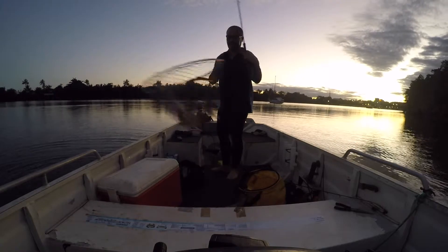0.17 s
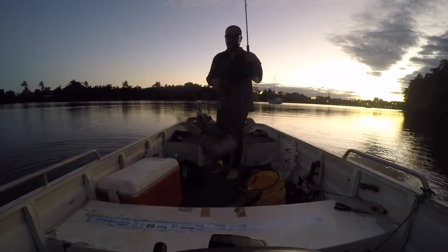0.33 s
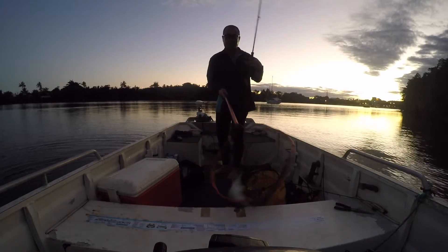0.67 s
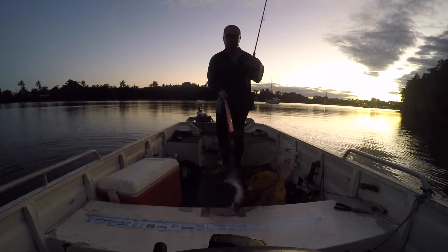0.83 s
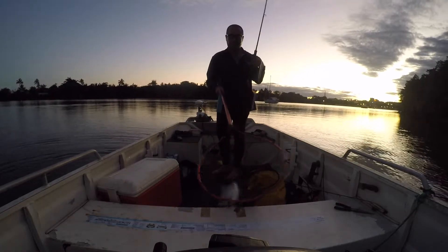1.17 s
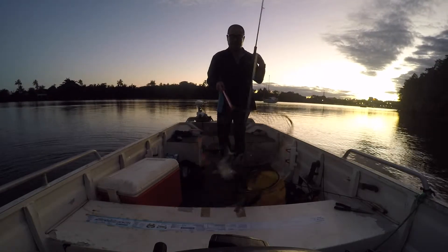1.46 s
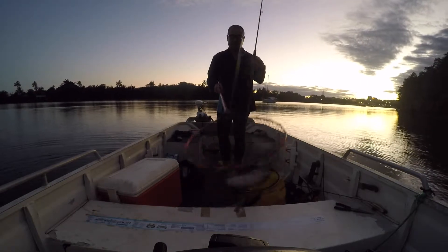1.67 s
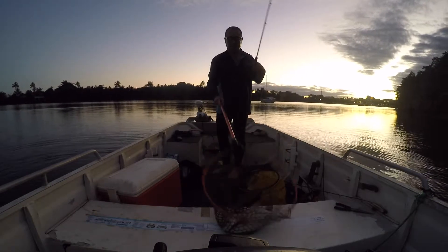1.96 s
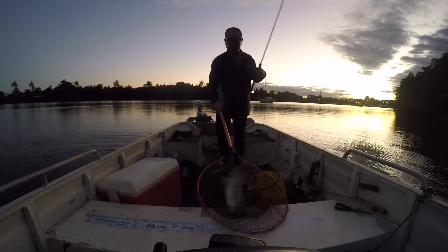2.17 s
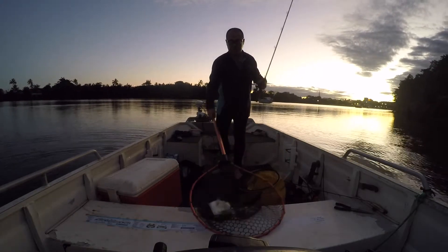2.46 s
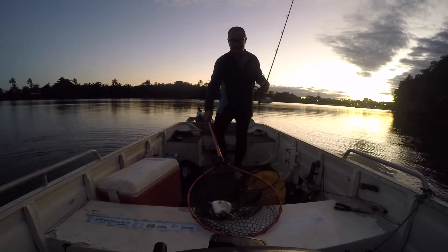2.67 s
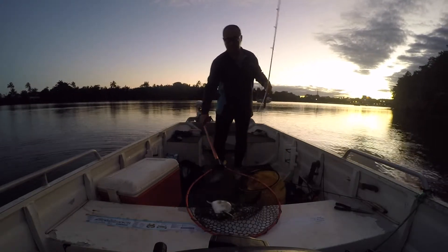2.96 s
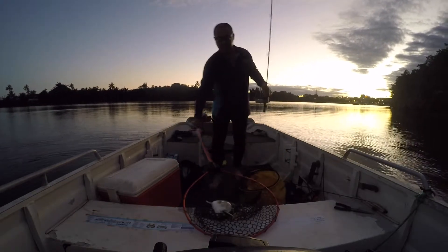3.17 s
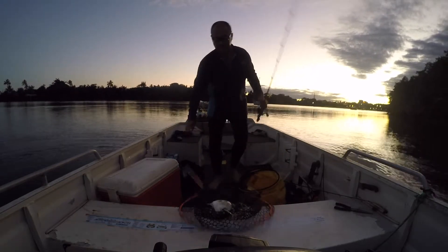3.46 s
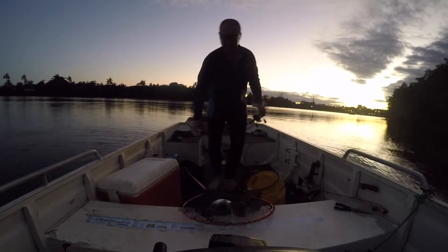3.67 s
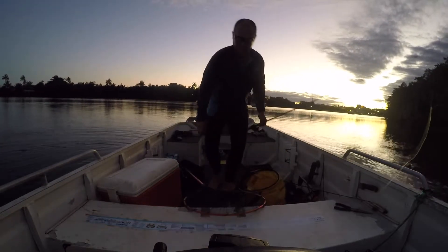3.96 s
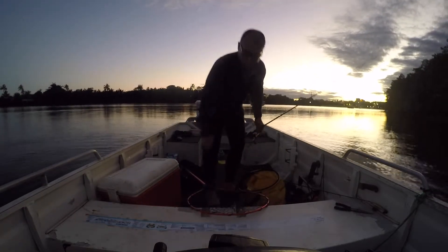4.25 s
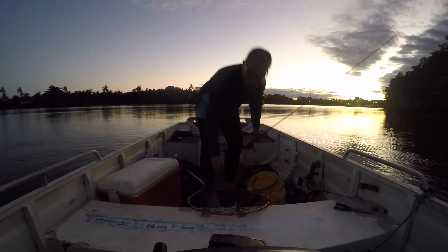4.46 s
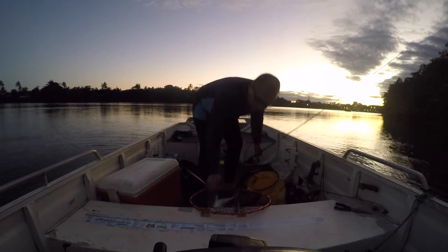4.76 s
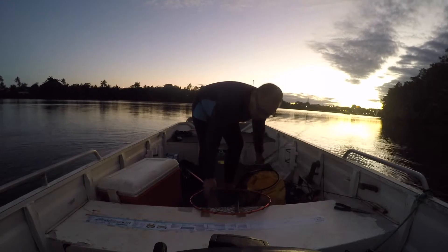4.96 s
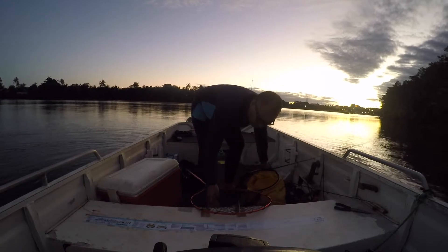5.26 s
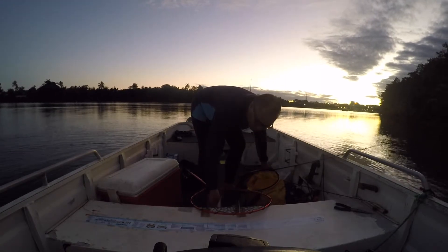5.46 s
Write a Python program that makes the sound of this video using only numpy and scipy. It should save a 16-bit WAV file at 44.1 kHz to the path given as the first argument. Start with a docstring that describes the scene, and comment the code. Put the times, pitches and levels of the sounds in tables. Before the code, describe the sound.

Aboard a small metal boat on calm water, heard close and mono with slightly dulled top end. A soft steady hiss with a very faint thin whine lies over a deep, gliding hull boom that swells as the boat rocks. From 0 to about 2.9 s, wet mesh rustles irregularly, with tiny drips and ticks, especially at 0.5-1 s and 1.5-2.4 s; water laps, and hollow slaps and gurgles sound near 1.1-1.2 s. Dull floor thuds are strongest around 1.9-2.4 s. About 3 s is quieter, mostly rumble. At 3.5-4 s, hoop and handle clatter in short metallic bursts, hardest near 3.57 s. The loudest sharp hollow knock comes at 4.17 s, with a small clack after. From 4.5 s there are faint rustles and low swells, then jerky scrapes and knocks at 5.2-5.5 s, the deck singing briefly, with a watery plunk near 5.4 s.

```python
"""A landing net with a fish in it is swung aboard a small metal boat and laid on the deck, on a calm evening.
From the start: hissing noise, water lapping and gurgling, and a low gliding tone for the hull that booms as it rocks.
Mostly until about 2.9 s, and again from 3.9 s, the wet mesh rustles and ticks: random contacts shaped by resonances.
At 3.5-4.3 s hoop and handle clatter as bursts of contacts that ring; a loud hollow knock of the handle at 4.2 s.
From 4.5 s the net is shoved along the floor in short jerks, and the deck sings after each one."""
import sys
import numpy as np
from scipy import signal
from scipy.fft import rfft, irfft, next_fast_len
from scipy.io import wavfile
from scipy.ndimage import uniform_filter1d

SR = 44100
rng = np.random.default_rng(int(sys.argv[2]) if len(sys.argv) > 2 else 0)


def master_out(mix):
    """Clip the mix to full scale and print it as 16-bit PCM to the path in sys.argv[1]."""
    frames = np.transpose(np.atleast_2d(mix))
    ceiling = np.clip(frames, -1, 1)
    pcm = np.round(ceiling * 32767).astype(np.int16)
    wavfile.write(sys.argv[1], SR, pcm)


N = 247910   # length of the scene in samples

# Every COLOUR table is a broad tone colour: (frequency [Hz], level [dB]).
# Every MODES table lists resonances standing out of it: (frequency [Hz], width [Hz], lift [dB]).


def from_db(db):
    """Turn decibels into a plain gain."""
    return 10 ** (np.asarray(db) / 20)


def rms_one(x):
    """Scale a sound so that its average (rms) strength is 1."""
    return x / np.sqrt(np.mean(x ** 2) + 1e-20)


def add(out, s, sound):
    """Mix a sound in at time s."""
    start = max(int(s * SR), 0)
    out[start:start + len(sound)] += sound[:N - start]


def coloured(x, colour, modes=()):
    """Send x through a body that responds at once (minimum phase), with a broad colour and resonances; rms 1."""
    size = next_fast_len(len(x))
    size += size % 2
    hz = np.fft.rfftfreq(size, 1 / SR)
    points = np.array(colour)
    db = np.interp(np.log(hz + 1), np.log(points[:, 0]), points[:, 1])
    for centre, width, lift in modes:
        db = db + lift / (1 + (2 * (hz - centre) / width) ** 2)
    # folding the cepstrum forward in time keeps the response from starting before its cause
    cepstrum = irfft(np.log(from_db(db)))
    cepstrum[1:size // 2] *= 2
    cepstrum[size // 2 + 1:] = 0
    response = np.exp(rfft(cepstrum))
    return rms_one(irfft(rfft(x, size) * response)[:len(x)])


def noise(colour, modes=()):
    """Steady noise of a given colour; rms 1."""
    return coloured(rng.standard_normal(N), colour, modes)


def grains(size, per_s, spread_db):
    """Tiny contacts at random moments, of uneven strength and random sign."""
    strength = from_db(spread_db * np.minimum(rng.exponential(1, size), 4))
    happens = rng.random(size) < per_s / SR
    return happens * strength * rng.choice([-1, 1], size)


def drift(size, rate_hz):
    """Random wander: straight lines between random points, rate_hz points a second, spread about 1."""
    steps = np.arange(size) * rate_hz / SR
    knots = rng.standard_normal(4000)
    return np.interp(steps, np.arange(len(knots)), knots)


def swells(rows, rise_s, fade_db_per_s, release_s, rest_db=-120):
    """Gain over time for rows of (s, length, dB): each rises, fades and is released; their powers add."""
    t = np.arange(0, N, 40) / SR   # one point every 40 samples is enough
    power = from_db(rest_db) ** 2
    for s, length, level_db in rows:
        age = np.maximum(t - s, 0)
        rise = np.sin(np.pi / 2 * np.clip(age / rise_s, 0, 1))
        release = np.sin(np.pi / 2 * np.clip((length - age) / release_s, 0, 1))
        power = power + (from_db(level_db - fade_db_per_s * age) * rise * release) ** 2
    return np.interp(np.arange(N) / SR, t, np.sqrt(power))


# borders of the low, middle and high band of a blow: (frequency [Hz])
BAND_EDGES_HZ = [600, 2400, 6500, 15500]


def blows(rows, colour, modes, low_db, high_db, rise_s, crack, tail_db, tail_t60, treble_damping):
    """A crack and a dying shiver of contacts ring a body, with a weak tail; levels are the middle band's first 12 ms."""
    out, t = np.zeros(N), np.arange(SR // 3) / SR
    attack = t < .012
    bands = [signal.butter(3, edges, "band", fs=SR, output="sos")
             for edges in zip(BAND_EDGES_HZ, BAND_EDGES_HZ[1:])]
    tail = from_db(tail_db - 60 * t / tail_t60)
    for s, level_db, bright_db, t60 in rows:
        shiver = from_db(-60 * t / t60) * (1 + crack * np.exp(-t / 0.00049)) + tail
        contacts = grains(len(t), per_s=9000, spread_db=3.0)
        ring = coloured(contacts * shiver * (1 - np.exp(-t / rise_s)), colour, modes)
        # a harder contact trades lows for highs; the highs die first
        shares_db = low_db - bright_db, 0, high_db + bright_db
        for k, (band, share_db) in enumerate(zip(bands, shares_db)):
            part = signal.sosfilt(band, ring) * np.exp(-treble_damping * k ** 2 * t)
            add(out, s, from_db(level_db + share_db) * part / np.sqrt(np.mean(part[attack] ** 2)))
    return out


# the evening hiss
AIR_COLOUR = [(30, 18), (150, -23.5), (400, -5.5), (900, -6), (1300, -11.5), (3000, -4), (6000, -8),
              (7000, -11.5), (13500, -16.5), (15500, -22)]
AIR_MODES = [(8400, 71, 3.1)]
AIR_DB = -63.5
WHINE_HZ, WHINE_BEAT_HZ, WHINE_DB = 10320, 25.5, -81.5   # level of each of the whine's two tones


def air():
    """Soft evening hiss, with a faint thin whine: two close tones that pulse as they beat together."""
    t = np.arange(N) / SR
    pulse = 2 * np.cos(np.pi * WHINE_BEAT_HZ * t)
    whine = from_db(WHINE_DB) * pulse * np.sin(2 * np.pi * WHINE_HZ * t)
    return from_db(AIR_DB) * noise(AIR_COLOUR, AIR_MODES) + whine


# ripples running along the hull: (time [s], length [s], level before fade and trim [dB])
LAPS = [(-0.03, 0.057, -32), (1.1, 0.34, -61.5), (1.85, .15, -53), (1.98, 0.16, -53), (2.27, 0.33, -63),
        (3.57, 0.17, -57), (3.8, 0.22, -60), (3.93, 0.22, -53), (4.1, 0.16, -61), (4.42, 0.22, -60.5),
        (4.2, 0.27, -58), (4.95, 0.21, -66), (5.3, 0.4, -72)]
WASH_COLOUR = [(300, -43.5), (680, -4), (830, -1), (980, 0.5), (1300, -8.5), (1600, -2), (2000, -8.5),
               (2500, -10.5), (6000, -27.5)]
LAP_RISE_S, LAP_FADE_DB_PER_S, LAP_RELEASE_S = .05, 10, 0.15
WASH_REST_DB, WASH_TRIM_DB = -67.5, -2.5   # level between ripples; the trim lowers both


def wash():
    """Ripples wash along the hull as a dense patter of tiny contacts."""
    lapping = swells(LAPS, LAP_RISE_S, LAP_FADE_DB_PER_S, LAP_RELEASE_S, WASH_REST_DB)
    patter = coloured(grains(N, per_s=2500, spread_db=1.0), WASH_COLOUR)
    return lapping * from_db(WASH_TRIM_DB) * patter


# hollow slaps of water and knocks on the hull:
# (time [s], level [dB], brightness [dB], time to fall 60 dB [s])
HULL_HITS = [(0.656, -58, -1.5, 0.074), (1.0562, -49.5, 5, 0.099), (1.1544, -56, -3, 0.14),
             (1.8574, -54, 0.5, 0.12), (1.8936, -57, -5.5, 0.093), (2.2076, -60, 1, 0.062),
             (2.6974, -64, -6.5, 0.088), (2.7652, -72.5, -8, 0.086), (2.9516, -69.5, -4, 0.059),
             (4.1666, -40.5, 4, 0.052), (4.1705, -43.5, -1.5, .1), (5.048, -64, 1, 0.04),
             (5.548, -60, 0.5, 0.15)]
HULL_HIT_COLOUR = [(400, -19), (750, -9), (1000, -4), (1300, -7), (1950, -3.5), (2350, -14.5), (2800, -3),
                   (3400, -15), (4200, -11.5), (5800, -18.5), (8500, -24), (14000, -34)]
HULL_HIT_MODES = [(646, 17, 6.7), (998, 80, 8), (1090, 89, 6.6), (1440, 72, 7.6), (1640, 44, 4.5),
                  (1970, 250, 4.6), (2010, 27, 5.4), (3290, 85, 13), (3370, 66, 5.2), (5710, 290, 11.7)]


def hull_hits():
    """Water or the handle hits the hull and rings its hollow resonances."""
    return blows(HULL_HITS, HULL_HIT_COLOUR, HULL_HIT_MODES, low_db=4.0, high_db=-10.5,
                 rise_s=0.00024, crack=0.32, tail_db=-15, tail_t60=0.43, treble_damping=24)


# gliding notes: air pockets in the water, and the falling ring of the knock at 4.17 s:
# (time [s], length [s], start pitch [Hz], glide [share of the pitch], peak level [dB], roughness [0-1, more counts as 1])
GLIDING_NOTES = [(0.045, 0.079, 800, 0.086, -57.5, .6), (0.576, 0.019, 1980, 0.019, -56, .5),
                 (1.056, 0.039, 954, -0.011, -48.5, 1.03), (1.157, .04, 1955, 0.032, -52, 0.5),
                 (1.176, 0.065, 724, .14, -49.5, 0.25), (1.195, .062, 2120, -.1, -58.5, .4),
                 (1.22, 0.046, 1670, -.07, -58, .1), (1.221, .07, 758, .1, -53, 0.35),
                 (2.696, 0.065, 1840, -0.088, -61, .8), (2.757, 0.087, 902, 0.077, -54.5, 0.67),
                 (2.837, 0.14, 870, -0.067, -65.5, 0.6), (2.948, .018, 1760, .68, -62, 0.5),
                 (3.839, 0.123, 942, -0.24, -55, 1.17), (3.969, 0.22, 823, 0.49, -55, 1.1),
                 (4.166, 0.019, 2063, -0.102, -31, 0.55), (4.17, 0.028, 1607, -0.21, -38, 0.9),
                 (4.253, .1, 1960, 0.066, -56, 0.76), (4.312, 0.13, 2020, -0.049, -62, 0.94),
                 (5.257, 0.061, 1060, .05, -50.5, 0.54), (5.371, 0.074, 912, 0.013, -44.5, 0.17)]


def gliding_notes(waver, churn_hz):
    """Air pockets in the water, and the knock at 4.17 s, ring with a gliding pitch; random churn blurs the note."""
    out = np.zeros(N)
    for s, length, start_hz, glide, peak_db, rough in GLIDING_NOTES:
        age, rough = np.linspace(0, 1, int(length * SR)), np.clip(rough, 0, 1)
        hz = start_hz * (1 + glide * age) * (1 + waver * drift(len(age), rate_hz=63))
        churn = drift(len(age), churn_hz) + 1j * drift(len(age), churn_hz)
        blur = np.sqrt(1 - rough ** 2) + rough * churn
        note = blur * np.exp(2j * np.pi * np.cumsum(hz) / SR)
        add(out, s, from_db(peak_db) * np.sin(np.pi * age) * note.real)
    return out


def water_and_knocks():
    """Ripples wash along the hull, slap and gurgle; the handle knocks on it."""
    return wash() + hull_hits() + gliding_notes(waver=0.012, churn_hz=222)


# the boat rocks and its lowest hull note swells: (time [s], length [s], level before fade [dB])
SWAYS = [(-0.1, 0.22, -26), (0.08, 0.39, -37), (0.47, 0.33, -37.5), (0.71, 0.36, -37), (1.07, 0.13, -19),
         (1.19, 0.13, -24), (1.26, 0.46, -35), (1.87, 0.21, -17.5), (2.07, 0.3, -19), (2.33, 0.18, -19.5),
         (2.49, 0.11, -15.5), (2.5, 0.79, -26.5), (3.13, 0.36, -24.5), (3.41, 0.25, -24.5),
         (3.6, 0.31, -27), (3.84, 0.46, -20), (4.28, 0.29, -19.5), (4.47, 0.15, -10), (4.6, 0.13, -16.5),
         (4.72, 0.26, -33), (4.9, 0.3, -16.5), (5.14, 0.14, -13), (5.26, 0.78, -19.5)]
SWAY_RISE_S, SWAY_FADE_DB_PER_S, SWAY_RELEASE_S = 0.11, 22, 0.1
HULL_HZ, HULL_SAG_HZ = 35, 14.39   # the note at rest; how far a swing of gain 1 would lower it
HULL_WANDER_HZ = 1.3   # random wander of the note


def hull():
    """The hull booms on one low note that sags as it swings wider; the swing also stirs the floor panels."""
    swing = swells(SWAYS, SWAY_RISE_S, SWAY_FADE_DB_PER_S, SWAY_RELEASE_S)
    pitch_hz = HULL_HZ - HULL_SAG_HZ * swing + HULL_WANDER_HZ * drift(N, rate_hz=4.7)
    boom = swing * np.sqrt(2) * np.sin(2 * np.pi * np.cumsum(pitch_hz) / SR)
    return boom + floor_panels(swing)


# feet and fish land on the floor panels: (time [s], rumble level before fade [dB], scuff level before fade [dB])
THUDS = [(-0.03, -47.5, -51), (0.06, -61, -70), (0.2, -52.5, -68), (0.46, -51, -63.5), (0.63, -45.5, -70),
         (0.74, -44.5, -65), (1.1, -46, -61), (1.24, -57, -70), (1.68, -56, -75), (1.857, -35, -54.5),
         (1.941, -28.5, -56), (2.06, -42, -65), (2.26, -44, -59.5), (2.382, -38.5, -62), (2.49, -44, -62),
         (3.21, -69, -61), (3.431, -49, -51.5), (3.56, -48, -50.5), (3.731, -41.5, -58), (3.85, -46, -58.5),
         (3.97, -47, -55), (4.22, -44.5, -59.5), (4.41, -48.5, -64), (4.5, -40, -58), (4.918, -40.5, -58),
         (5.109, -39.5, -61.5), (5.22, -35.5, -61), (5.37, -44.5, -53), (5.46, -34.5, -59),
         (5.54, -51, -60)]
PANEL_COLOUR = [(45, -12), (60, -0.5), (80, 6.5), (95, -3.5), (115, -16.5), (135, -14), (170, -32.5),
                (300, -62)]
SCUFF_COLOUR = [(70, -15), (130, 1.5), (200, 2), (300, -1), (500, -6), (750, -9.5), (1500, -18),
                (4000, -63)]
THUD_RISE_S, THUD_FADE_DB_PER_S, THUD_LENGTH_S = 0.017, 90.5, 0.45
PANEL_REST_DB, PANEL_COUPLING_DB = -62, -31   # rumble at rest; rumble relative to the swing
SCUFF_REST_DB, SCUFF_COUPLING_DB = -68, -42   # the same for the scuffing


def floor_panels(swing):
    """Thuds and the hull's swing shake the panels into a low rumble and a softer, higher scuffing."""
    shape = THUD_RISE_S, THUD_FADE_DB_PER_S, THUD_LENGTH_S / 2
    rumble = swells([(s, THUD_LENGTH_S, db) for s, db, _ in THUDS], *shape, PANEL_REST_DB)
    scuff = swells([(s, THUD_LENGTH_S, db) for s, _, db in THUDS], *shape, SCUFF_REST_DB)
    rumble = np.hypot(rumble, from_db(PANEL_COUPLING_DB) * swing)
    scuff = np.hypot(scuff, from_db(SCUFF_COUPLING_DB) * swing)
    panel = noise(PANEL_COLOUR)
    # even out the noise so that the rumble follows its gain closely
    panel = panel / np.sqrt(uniform_filter1d(panel ** 2, size=SR // 12) + 0.022)
    return rumble * panel + scuff * noise(SCUFF_COLOUR)


# the sound of the wet mesh, shared by droplets, crackle, rustle and ticks
TICK_COLOUR = [(500, -10.5), (1000, 1.5), (3500, 0), (5500, 0), (6800, -6), (8500, -4), (10000, -9.5),
               (13500, -7.5), (15500, -16)]


def droplets(per_s, count=14):
    """Knots and drops flick off the mesh, each a tiny tick at one of a few pitches; rms 1."""
    out = np.zeros(N)
    for hz in np.geomspace(5200, 9200, count):
        r = from_db(-60 * hz / (45 * SR))   # falls 60 dB in 45 cycles
        w = 2 * np.pi * hz / SR
        flicks = grains(N, per_s / count, spread_db=4.0)
        out += signal.lfilter([np.sin(w)], [1, -2 * r * np.cos(w), r * r], flicks + 1e-18)
    return coloured(out, TICK_COLOUR)


# resonances of the ticking mesh, shared by crackle and ticks
TICK_MODES = [(1020, 120, 15), (1830, 260, 9.3), (3540, 160, 8.2), (4450, 340, 3.1), (5710, 340, 12.7),
              (7860, 1200, 11)]


def crackle(per_s, t60):
    """Single knots slip at random, each a tiny noisy tick that dies fast; rms 1."""
    t = np.arange(SR // 10) / SR
    slips = np.zeros(N)
    for _ in range(4):   # four different ticks
        moments = grains(N, per_s / 4, spread_db=3.0)
        tick = rng.standard_normal(len(t)) * from_db(-60 * t / t60)
        slips += signal.fftconvolve(moments, tick)[:N]
    return coloured(slips, TICK_COLOUR, TICK_MODES)


# the wet mesh is dragged: (time [s], length [s], level before fade and the layers' trims [dB])
DRAGS = [(0.02, 0.22, -56), (0.33, 0.34, -62.5), (0.62, 0.17, -62.5), (0.8, 0.42, -62), (1.14, 0.1, -49.5),
         (1.27, .25, -64.5), (1.5, 0.49, -60), (1.85, 0.12, -51), (1.96, 0.18, -53), (2.24, 0.31, -56),
         (2.55, .25, -67.5), (3.93, .18, -56.5), (4.44, 0.77, -60.5), (5.0, 0.27, -63)]
MESH_MODES = [(3300, 270, 6), (6320, 280, 1), (7760, 740, -1)]
DRAG_RISE_S, DRAG_FADE_DB_PER_S, DRAG_RELEASE_S = 0.044, 12.5, 0.07


def dragged_mesh():
    """The mesh catches and slips, so its grains come in clumps; drops and knots tick along with it."""
    drag = swells(DRAGS, DRAG_RISE_S, DRAG_FADE_DB_PER_S, DRAG_RELEASE_S)
    snagging = from_db(5 * np.clip(drift(N, rate_hz=110), -2, 1.6))
    rustle = coloured(snagging * grains(N, per_s=3000, spread_db=5.0), TICK_COLOUR, MESH_MODES)
    spray = from_db(-10.5) * droplets(per_s=160) + from_db(-6.5) * crackle(per_s=60, t60=.04)
    return drag * (from_db(-8.5) * rustle + spray)


# ticks of mesh, drips and the flapping fish: (time [s], level [dB], brightness [dB], time to fall 60 dB [s])
TICKS = [(0.0822, -59.5, -3, 0.061), (0.3462, -60.5, -6, 0.18), (0.4376, -66, 4, 0.18),
         (0.4878, -56.5, -1, 0.09), (0.501, -53, 4.5, 0.1), (0.5118, -53, -5, 0.088),
         (0.5272, -52.5, -1, 0.084), (0.6218, -56.5, 1, 0.11), (0.6518, -47, 2, 0.12),
         (0.7306, -48.5, -2, 0.22), (0.7824, -49.5, 1, 0.18), (0.8022, -57, 3, 0.14),
         (0.8302, -64, 0, 0.066), (0.8928, -60, 4.5, 0.032), (0.956, -54.5, 2.5, 0.061),
         (1.0128, -55, 0, 0.079), (1.535, -57.5, 0.5, 0.27), (1.6032, -54.5, 0, 0.029),
         (1.658, -52, 1, 0.025), (1.8936, -54.5, 4.5, .08), (1.9654, -57, 0, 0.08), (1.999, -51, -4, 0.5),
         (2.0248, -52, 3.5, 0.05), (2.0858, -56, -0.5, 0.12), (2.1824, -60, 0, 0.071), (2.2838, -61, 3, .2),
         (2.298, -50, -8, .085), (2.305, -51, -3, 0.069), (2.3828, -55.5, -2, 0.015),
         (2.44, -50.5, -2.5, 0.15), (2.6244, -63, 0, 0.046)]


def ticks():
    """Light taps ring the mesh's colour and resonances."""
    return blows(TICKS, TICK_COLOUR, TICK_MODES, low_db=-11, high_db=-4.0,
                 rise_s=0.00056, crack=2.8, tail_db=-29, tail_t60=0.17, treble_damping=25)


# hoop and handle striking the deck: (time [s], level [dB], brightness [dB])
CLATTER = [(3.4736, -48, -2.5), (3.4822, -48, -3.5), (3.5675, -34, 3), (3.5948, -50, 1),
           (3.6149, -40.5, 0.5), (3.6417, -40.5, -1.5), (3.795, -56, -6), (3.804, -58, -4),
           (3.8352, -50.5, 4), (3.919, -47, -2), (3.9545, -46.5, 3), (4.23, -44, 2), (4.251, -52, 0)]
METAL_COLOUR = [(500, -26.5), (900, 2), (2000, 5), (2450, -1), (3300, 5), (5800, -5), (6600, -14),
                (8200, -9.5), (9300, -22.5), (11500, -15.5), (13500, -21.5), (15500, -42)]
METAL_MODES = [(1030, 107, 16.5), (1390, 19, 10), (1682, 120, 10.2), (2052, 90, 13.2), (3160, 24, 4),
               (3570, 94, 6.8), (4550, 350, 3.7), (4780, 81, 1), (5800, 250, 9.4), (6840, 150, 6),
               (8050, 72, 2)]
CLATTER_T60_S = 0.11


def clatter():
    """Hoop and handle hit the deck and ring its metal."""
    hits = [(*hit, CLATTER_T60_S) for hit in CLATTER]
    return blows(hits, METAL_COLOUR, METAL_MODES, low_db=-7.5, high_db=-4.5,
                 rise_s=0.0008, crack=0.33, tail_db=-20, tail_t60=0.44, treble_damping=36)


# the net shoved along the floor in short jerks: (time [s], level [dB], brightness [dB])
SHOVES = [(4.5217, -58.5, 6), (4.5338, -54, -1.5), (4.8615, -54.5, 0.5), (4.9097, -56.5, -2),
          (5.184, -44, 3.5), (5.242, -58, -1), (5.2651, -49, 3.5), (5.338, -49.5, 1.5), (5.3717, -41, 0.5),
          (5.396, -42.5, 0.5), (5.4308, -51.5, 0.5), (5.4694, -55, -5)]
SHOVE_COLOUR = [(500, -8), (900, -4.5), (1500, -2), (1950, 10.5), (2200, -4), (2700, 3), (3400, 3.5),
                (5800, 0), (6400, -16), (7800, -12), (9500, -20), (13600, -16), (15500, -26)]
SHOVE_MODES = [(966, 140, 16.4), (1024, 62, 4.6), (1410, 100, 15), (1653, 120, 1.85), (3470, 120, 6),
               (4380, 100, 7.3), (5570, 90, 2.3), (5730, 70, 6.6)]
SHOVE_T60_S = 0.11


def shoves():
    """Each jerk is a softer-edged blow that rings net and floor."""
    jerks = [(*jerk, SHOVE_T60_S) for jerk in SHOVES]
    return blows(jerks, SHOVE_COLOUR, SHOVE_MODES, low_db=-3.5, high_db=-5.5,
                 rise_s=0.002, crack=.2, tail_db=-43, tail_t60=0.23, treble_damping=10.4)


# the singing deck
SCRAPE_COLOUR = [(400, -35), (600, 2), (950, -5), (1300, -17), (2000, -3), (3000, -42)]
SCRAPE_MODES = [(548, 15, 22), (649, 26, 15.4), (966, 95, 11), (1028, 100, 13), (1044, 70, 10.5),
                (1509, 44, 27), (1680, 80, 6.9)]
SCRAPE_DB = -12   # relative to the shove, before the fade
SCRAPE_RISE_S, SCRAPE_FADE_DB_PER_S, SCRAPE_LENGTH_S = .015, 82, 0.47


def scrape():
    """The deck sings after each shove: scraping grains ring its narrow resonances."""
    rows = [(s, SCRAPE_LENGTH_S, db + SCRAPE_DB) for s, db, _ in SHOVES]
    singing = swells(rows, SCRAPE_RISE_S, SCRAPE_FADE_DB_PER_S, SCRAPE_LENGTH_S / 2)
    return singing * coloured(grains(N, per_s=970, spread_db=1.0), SCRAPE_COLOUR, SCRAPE_MODES)


def net():
    """The mesh rustles and ticks; hoop and handle clatter on the deck and scrape along the floor."""
    return dragged_mesh() + ticks() + clatter() + shoves() + scrape()


def scene():
    """Air, water and knocks, hull and net together, in one channel."""
    return (air() + water_and_knocks() + hull() + net())[None]


CUTOFF_HZ = 15700


def record(dry):
    """Cut everything above the cutoff steeply."""
    return signal.sosfilt(signal.ellip(10, .1, 80, CUTOFF_HZ, fs=SR, output="sos"), dry)


dry = scene()
out = record(dry)
master_out(out)
```